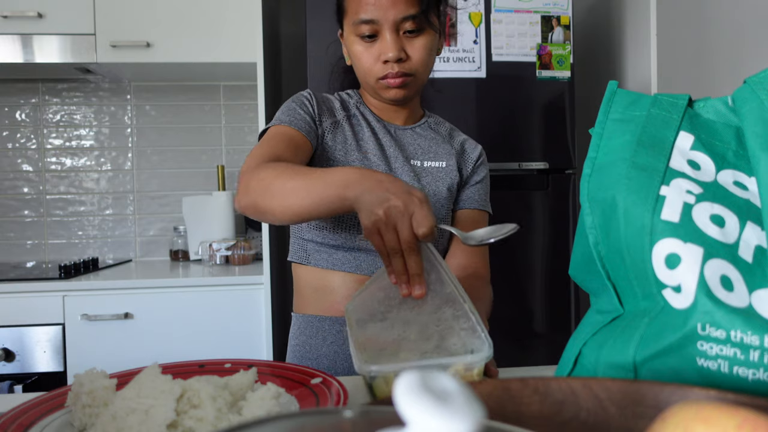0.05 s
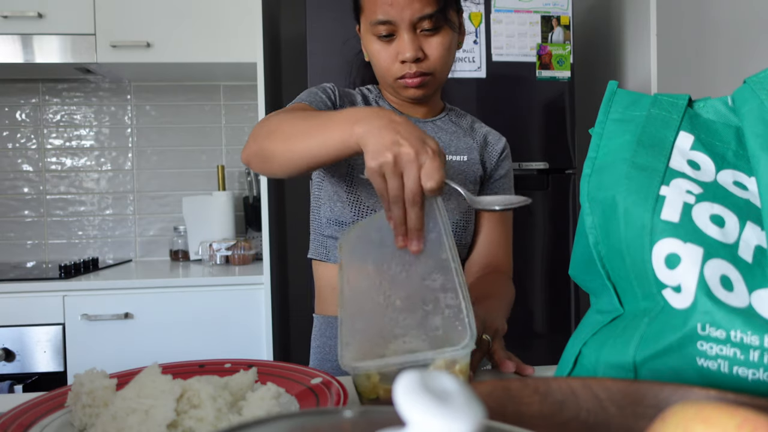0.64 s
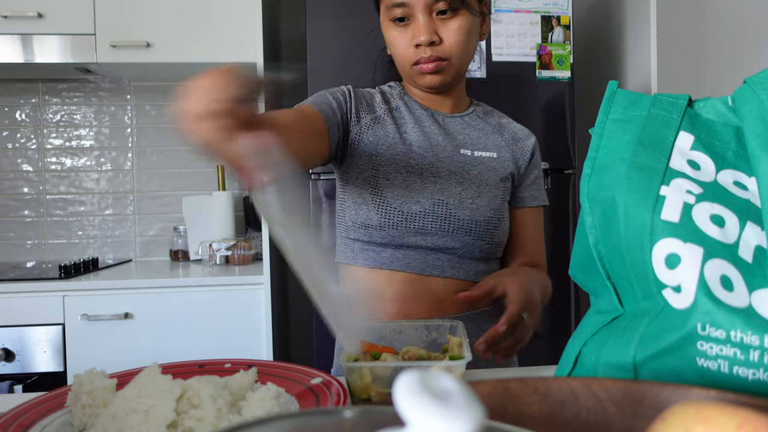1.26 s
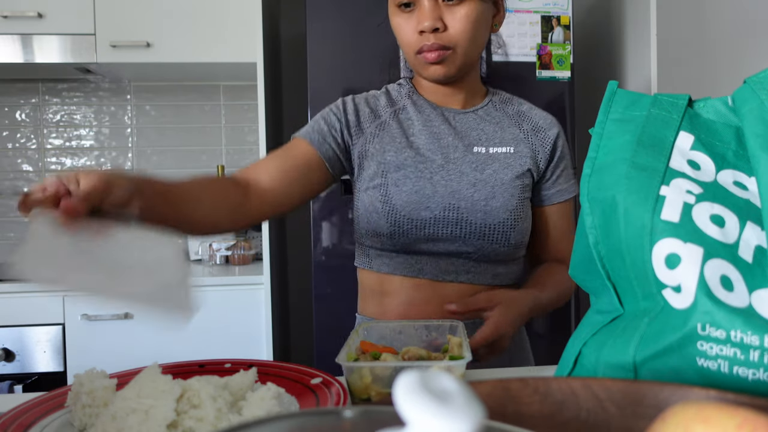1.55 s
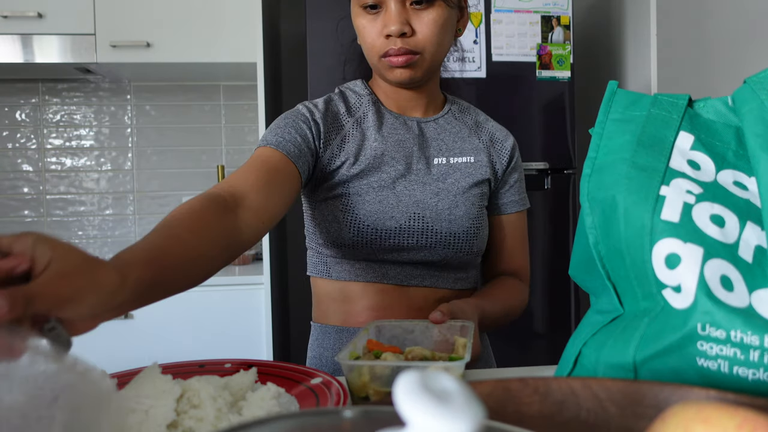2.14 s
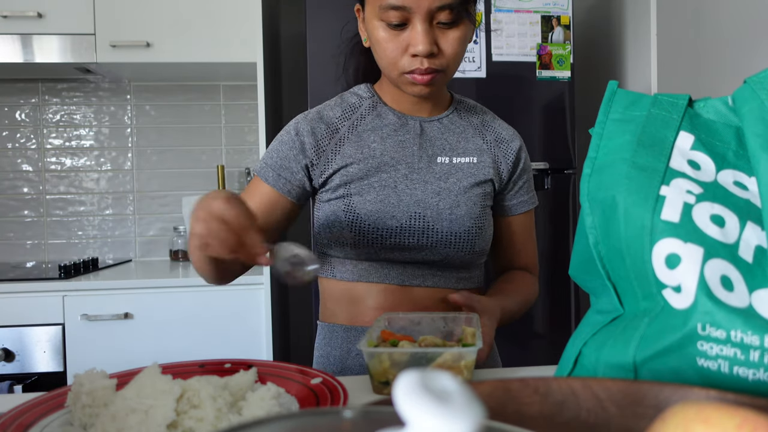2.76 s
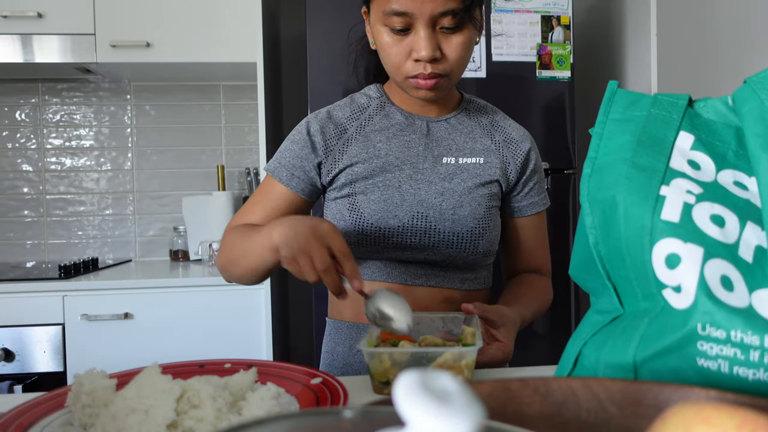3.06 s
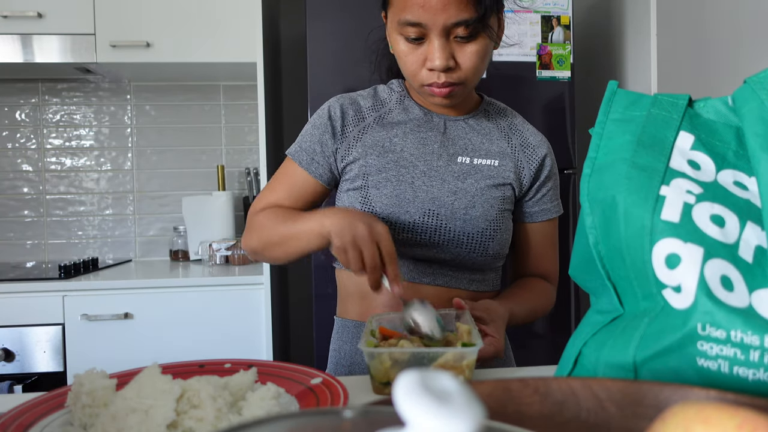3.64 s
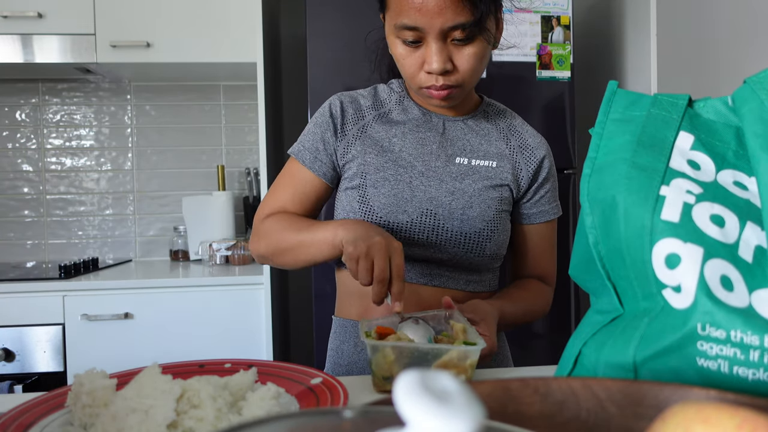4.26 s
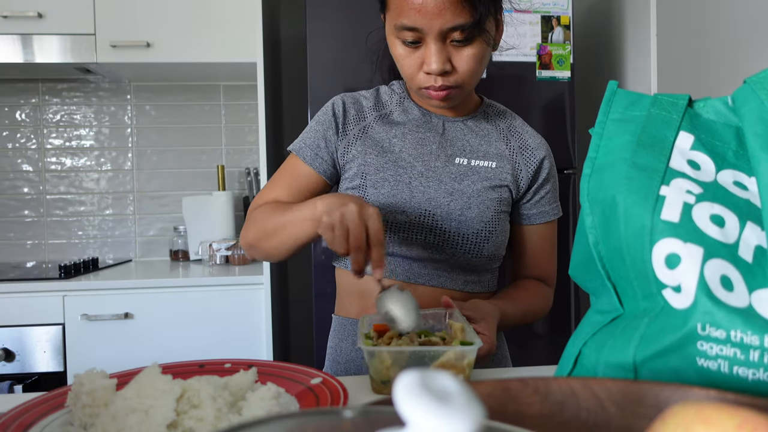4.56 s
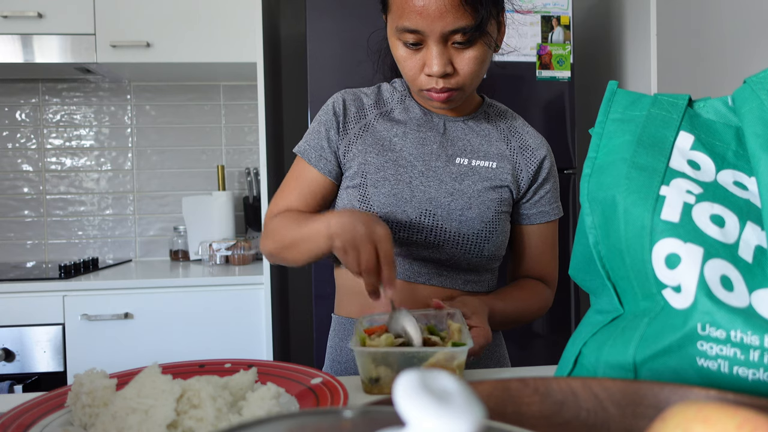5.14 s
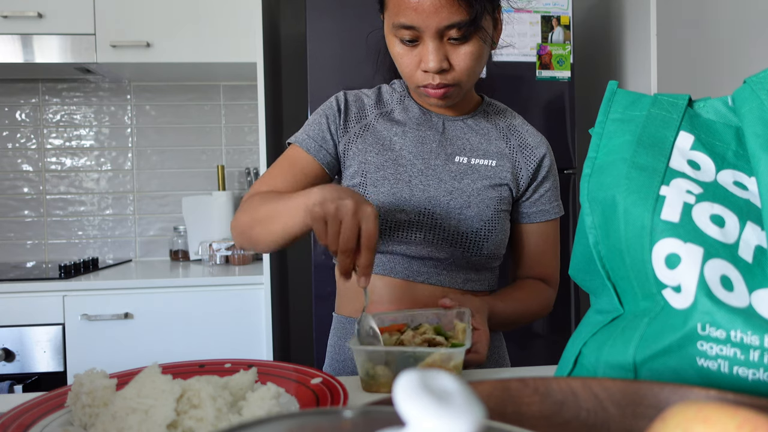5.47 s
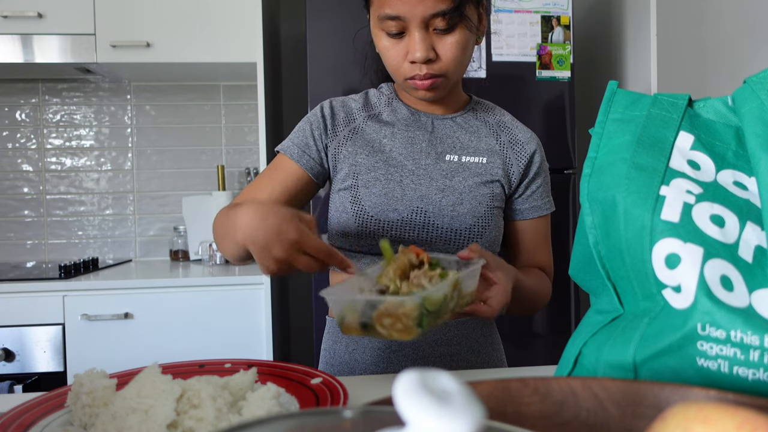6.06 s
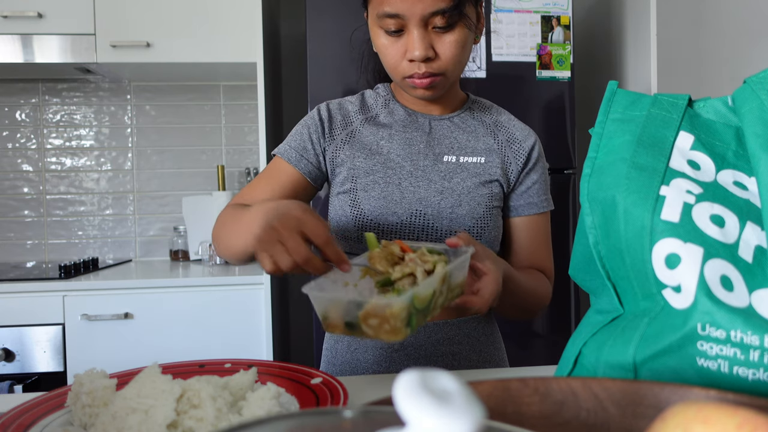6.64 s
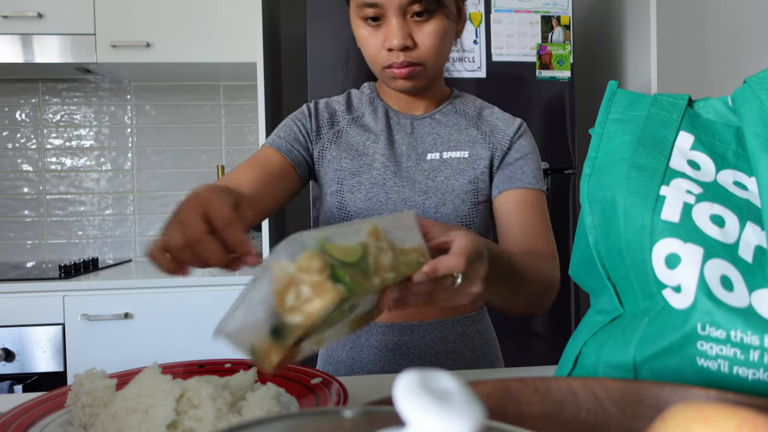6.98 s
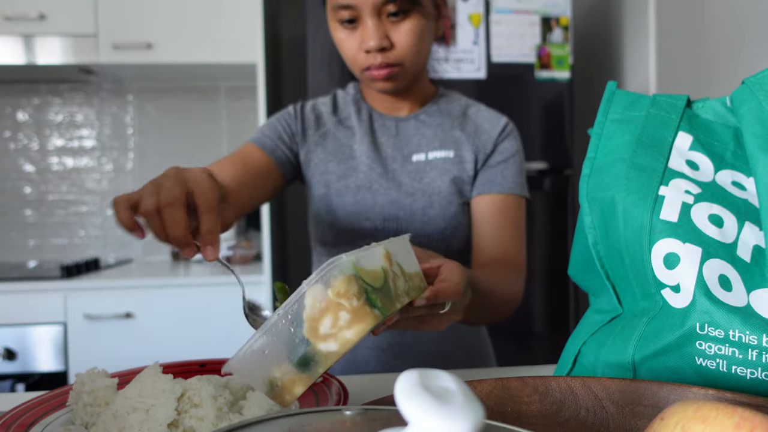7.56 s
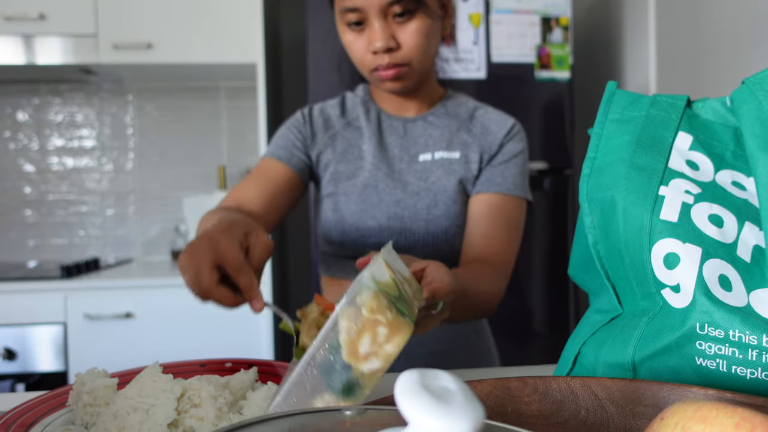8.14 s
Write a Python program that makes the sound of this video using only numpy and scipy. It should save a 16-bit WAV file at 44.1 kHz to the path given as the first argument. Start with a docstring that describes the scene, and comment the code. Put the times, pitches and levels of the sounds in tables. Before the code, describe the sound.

A plastic lid peels off a food tub in a run of sharp snaps. After a knock with a brief ring, the lid is put down with a quick, clinking clatter. A metal spoon then digs through moist food in short, soft strokes with sticky clicks, and taps against the tub several times. The sounds are fairly close, in a hard-walled kitchen with short reverberation and a faint hiss.

```python
"""Opening a plastic food tub

In a tiled kitchen the lid snaps and peels free of the rim and is laid down with a clatter. A metal
spoon digs through moist food in short strokes and taps the tub, which is tipped over a plate.
Each contact is a few milliseconds of chatter that excites the damped resonances of the plastic,
brighter the harder it is; the hard room reverberates after it."""
import sys
import numpy as np
from scipy import signal
from scipy.fft import rfft, irfft
from scipy.io import wavfile

SR = 44100
rng = np.random.default_rng(int(sys.argv[2]) if len(sys.argv) > 2 else 0)


def to_wav(sig):
    """Store sig (one row per channel, or 1-D mono) as 16-bit WAV at the path in sys.argv[1].

    Samples outside -1..1 are clipped; the rate is SR.
    """
    pcm = np.clip(np.atleast_2d(sig), -1, 1) * 32767
    pcm = np.round(pcm).astype(np.int16)
    wavfile.write(sys.argv[1], SR, pcm.T)  # frames by channels


N = 366603
TIME = np.arange(N) / SR
SIZE = 2048  # samples in the impulse response of one contact
FREQ = np.arange(SIZE // 2 + 1) * SR / SIZE + 1

# fingers rubbing the plastic, then the spoon dragging through food: start_s, length_s, level_db
STROKES = [(1.048, 0.18, -57), (1.36, 0.11, -62), (1.798, 0.14, -63), (2.174, 0.18, -56),
           (3.249, 0.053, -68.5), (3.454, 0.15, -59), (3.924, 0.56, -66.5), (4.657, 0.45, -62.5),
           (4.797, 0.1, -59.5), (5.152, 0.29, -67), (5.498, 0.21, -58), (6.735, 0.24, -66.5),
           (7.867, 0.4, -59.5)]
# the treble falls away steeply above 9 kHz, the same for every contact: frequency_hz, gain_db
TREBLE_LOSS = [(9000, -0.5), (11500, -9.5), (15500, -12.5)]


def undb(db):
    """Decibels as an amplitude ratio."""
    return 10 ** (np.asarray(db) / 20)


def add(track, start_s, sound):
    """Superposition: a sound adds to the track from its start time."""
    i = max(0, int(start_s * SR))
    track[i:i + len(sound)] += sound[:max(0, N - i)]


def across(hz, points, column=1):
    """Interpolation of a table along log frequency."""
    points = np.array(points)
    return np.interp(np.log(hz + 1), np.log(points[:, 0]), points[:, column])


def colour(x, spectrum):
    """Spectral shaping, scaled to unit rms."""
    shaped = irfft(rfft(x) * undb(across(np.fft.rfftfreq(N, 1 / SR), spectrum)), N)
    return shaped / shaped.std()


def highpass(x, order, cutoff_hz):
    """Butterworth attenuation below the cutoff."""
    return signal.sosfilt(signal.butter(order, cutoff_hz, "high", fs=SR, output="sos"), x)


def resonance(hz, width_hz):
    """Gain of a damped resonance with steep skirts."""
    return 1 / (1 + ((FREQ / hz - hz / FREQ) * hz / width_hz) ** 2)


def minimum_phase(gain):
    """Minimum phase gives the quickest impulse response that has this gain."""
    cepstrum = irfft(np.log(gain + 1e-6))
    cepstrum[1:SIZE // 2] *= 2
    cepstrum[SIZE // 2 + 1:] = 0
    return irfft(np.exp(rfft(cepstrum)))


def radiate(sound, room_db):
    """Sound takes two paths: direct to the listener, and out into the room."""
    return np.array([sound, sound * undb(room_db)])


def stereo(mid, side, side_db):
    """Sum and difference: the weaker the side signal, the more alike left and right."""
    return mid + undb(side_db) * side * np.array([[1], [-1]])


def air(level_db, side_db, waver_db):
    """Background noise: a faint hiss whose level wavers slowly."""
    spectrum = [(18, -71), (30, -39), (75, -17.5), (252, -7), (486, -5.5), (740, 3.5), (844, -2),
                (1100, 1.5), (1720, -2.5), (2980, -5), (3670, -8), (3980, -6.5), (8980, -17.5),
                (14800, -22.5), (16000, -28.5)]  # room hiss: frequency_hz, density_db
    mid, side = (colour(rng.standard_normal(N), spectrum) for _ in range(2))
    drift = signal.resample(rng.standard_normal(size=40), N)
    return undb(level_db - waver_db * drift) * stereo(mid, side, side_db)


def kitchen(sound, gap_s, build_s, worktop_db, side_db):
    """Reverberation: the worktop reflects first, then tiles and cupboards build a decaying tail."""
    response = [(120, -10, .5), (290, 0, 0.25), (390.7, -4.5, 0.76), (935, -2.5, 0.57), (1390, -3.5, 0.64),
                (4000, 0, 0.56), (9000, -2, 0.54), (14620, 0, .38)]  # reverberant field: frequency_hz, level_db, t60_s
    t = TIME[:SR]
    log_freq = np.log(np.fft.rfftfreq(SR, 1 / SR) + 1)
    onset = np.clip((t - gap_s) / build_s, 0, 1) ** .25
    noise = rfft(rng.standard_normal((2, SR)))
    centres_hz = np.geomspace(60, 18000, 24)
    tail = 0
    for hz, share in zip(centres_hz, np.eye(len(centres_hz))):
        band = np.interp(log_freq, np.log(centres_hz), share)
        t60_s = across(hz, response, column=2)
        part = irfft(noise * band) * onset * undb(-60 * t / t60_s)
        part /= np.linalg.norm(part, axis=1, keepdims=True)
        tail += part * np.sqrt(np.mean(band ** 2)) * undb(across(hz, response))
    tail[0, int(gap_s * SR)] += undb(worktop_db)
    mid, side = signal.fftconvolve(sound[None], tail, axes=1)[:, :N]
    return stereo(mid, side, side_db)


def chatter(contact_s):
    """Broadband excitation: a brief run of micro-slips with unit energy."""
    fade = np.exp(-(TIME[:SIZE] / contact_s) ** 2)
    force = rng.standard_normal(SIZE) * fade
    for _ in range(4):  # flatten the spectrum while keeping the burst short
        force = irfft(np.exp(1j * np.angle(rfft(force)))) * np.sqrt(fade)
    return force / np.linalg.norm(force)


def ring(modes, gain_db):
    """Free vibration: a sum of exponentially decaying modes."""
    t = TIME[:SR // 2]
    hz, db, t60_s = np.transpose(modes)[:, :, None]
    sign = rng.choice([-1, 1], (len(modes), 1))
    waves = sign * undb(db + gain_db - 60 * t / t60_s) * np.sin(2 * np.pi * hz * t)
    return highpass(waves.sum(axis=0), 2, 800)  # a small object radiates no bass


def pops(events, relative_width, contact_s, gain_db, room_db):
    """Impulse excitation: each small contact drives one damped resonance."""
    out = np.zeros(N)
    for start_s, db, hz in events:
        gain = resonance(hz, relative_width * hz) * undb(across(FREQ, TREBLE_LOSS))
        pop = signal.fftconvolve(minimum_phase(gain), chatter(contact_s))
        add(out, start_s, undb(db + gain_db) * pop / np.abs(pop).max())
    return radiate(out, room_db)


def plastic(spectrum, contact_s, ripple_db):
    """Modal coupling: each spot on the thin wall favours its own modes, rippling the spectrum."""
    coupling = signal.resample(rng.standard_normal(size=90), len(FREQ))
    ripple = undb(ripple_db * np.tanh(coupling))
    gain = spectrum * ripple / np.sqrt(np.mean(ripple ** 2))
    return signal.fftconvolve(minimum_phase(gain), chatter(contact_s))


def contacts(blows, thud_db, wall_db, crack_db, contact_s, thud_hz, rim_width, direct_db, lowest_hz):
    """Impact on plastic: the hollow thuds, the wall flexes, the rim rings; hard blows crack more."""
    near, far = np.zeros((2, N))
    for start_s, db, hardness_db, rim_hz, room_db in blows:
        thud = undb(thud_db - .84 * hardness_db) * resonance(thud_hz, thud_hz)
        wall = undb(wall_db - .13 * hardness_db) * resonance(1462, 2000)
        rim = resonance(rim_hz, rim_width * rim_hz)
        crack = undb(crack_db + hardness_db) * resonance(7000, 16000)
        spectrum = np.linalg.norm([thud, wall, rim, crack], axis=0) * undb(db + across(FREQ, TREBLE_LOSS))
        # the wall modes stand out in any one direction and average out in the room
        add(near, start_s, plastic(spectrum, contact_s, ripple_db=4.5) * undb(direct_db))
        add(far, start_s, plastic(spectrum, contact_s, ripple_db=1.8) * undb(room_db))
    return highpass([near, far], 3, lowest_hz)


def effort(attack_s=.014, release_s=.035):
    """Amplitude envelope of the friction: each stroke swells, holds and dies away."""
    push = np.zeros(N)
    for start_s, length_s, db in STROKES:
        swell = np.clip((TIME - start_s) / attack_s, 0, 1)
        release = np.exp(-np.maximum(TIME - start_s - length_s, 0) / release_s)
        push += undb(db) * swell * release
    return push


def scraping(gain_db, room_db, grains_per_s=1100, spread_db=3):
    """Shot noise: fingers rub and moist food parts in a dense crackle of tiny impulses."""
    spectrum = [(800, -19.5), (2400, 0), (3000, 2.5), (3500, -1), (4100, 3), (4700, -0.5), (8000, -4),
                (10500, -10.5), (15000, -19.5)]  # scraping, with two resonances of the filled tub: frequency_hz, level_db
    grains = (rng.random(N) < grains_per_s / SR) * rng.choice([-1, 1], N)
    sizes = undb(spread_db * np.minimum(rng.exponential(size=N), 3))
    crackle = colour(grains * sizes, spectrum) * effort() * undb(gain_db)
    return radiate(crackle, room_db)


def tub_bumps():
    """Soft, long contacts excite low resonances as the tub is moved and tipped."""
    bumps = [(.56, -34, 305), (.958, -52, 168), (7.263, -51.5, 624), (7.279, -56.5, 728), (7.312, -47, 568)]  # bumps of the tub: start_s, level_db, pitch_hz
    return pops(bumps, relative_width=.3, contact_s=.014, gain_db=-1, room_db=-2.5)


def sticky_clicks(per_s=14, boost_db=9, scatter_db=7, pitch_hz=5950, spread_octaves=.52):
    """Adhesion: spoon, food and fingers click at set moments and at random within each stroke."""
    clearest = [(1.586, -33.5, 8700), (1.602, -32, 5230), (1.7636, -35.5, 6800), (1.944, -47, 8700),
                (3.231, -46, 9200), (3.307, -41.5, 7530), (3.4878, -45, 5360), (4.109, -38.5, 4500),
                (4.2505, -41.5, 5350), (4.291, -38.5, 5300), (4.4074, -42.5, 4500), (4.784, -34.5, 7700),
                (4.842, -32.5, 7660), (5.005, -38, 5430), (5.492, -38, 5260), (5.721, -38, 7200),
                (6.4635, -41, 2920), (6.5527, -46.5, 6100), (7.714, -41.5, 5170), (7.740, -38.5, 5100)]  # the clearest clicks: start_s, level_db, pitch_hz
    clicks = list(clearest)
    for start_s, length_s, db in STROKES:
        waits_s = np.cumsum(rng.exponential(size=16)) / per_s
        for wait_s, (strong, high) in zip(waits_s, rng.standard_normal((16, 2)).clip(-2, 2)):
            if wait_s < length_s:
                hz = pitch_hz * 2 ** (spread_octaves * high)
                clicks.append((start_s + wait_s, db + boost_db + scatter_db * strong, hz))
    return pops(clicks, relative_width=.5, contact_s=.0052, gain_db=-2, room_db=-2.5)


def taps(rebound_s=.0065, loss_db=11.5, rebound_hz=1580, rebound_room_db=6.5):
    """Elastic rebound: each knock lands again, softly, on the broad wall that radiates into the room."""
    # spoon and lid knocking on plastic: start_s, strength_db, hardness_db, rim_hz, room_db
    knocks = [(1.4942, 9, -11, 1780, -1.5), (1.69, -11, -23.5, 1700, 12), (2.0748, 6, 0, 1197, -2),
              (5.426, -3, 5, 4480, 1.5), (5.764, 1.5, -5.5, 2310, 5), (6.023, -3.5, -1, 1500, 5.5),
              (6.079, -11, -7, 1220, 10.5), (6.0946, -7, -1.5, 3400, 0), (6.170, 6, -4.5, 3650, -7.5),
              (6.1766, 1, -3, 1340, 6.5), (6.2507, -11.5, 2, 3440, 4.5), (7.5178, -2.5, 2.5, 3130, 4.5),
              (7.728, -16.5, 2, 3500, 6.5), (7.794, -3.5, 1.5, 3800, -2.5), (7.826, -20, -8, 3580, -8),
              (8.224, -7, -6, 940, 4.5), (8.3085, 4, -1.5, 2170, 0)]
    rebounds = [(start_s + rebound_s, db - loss_db, hardness_db, rebound_hz, rebound_room_db)
                for start_s, db, hardness_db, *_ in knocks]
    return contacts(knocks + rebounds, thud_db=-28.5, wall_db=-5, crack_db=-18.5, contact_s=.0032,
                    thud_hz=300, rim_width=.44, direct_db=1.5, lowest_hz=150)


def lid_ring(start_s, gain_db, room_db):
    """Natural modes: the free lid and the spoon knock together and sound one short note."""
    modes = [(1292, -13, .25), (1712, 0, .3), (1745, -6, .25), (1725, -22, 1.3), (1997, -2, .04),
             (5170, -20, .12), (11240, -32, .25)]  # modes of lid and spoon: pitch_hz, level_db, t60_s
    out = np.zeros(N)
    add(out, start_s, ring(modes, gain_db))
    return radiate(out, room_db)


def bounces(first_gap_s=.019, restitution=.9, loss_db=2.5, clink_loss_db=3.5, settle_hz=2723):
    """Inelastic collisions: after their last blow, lid and spoon bounce ever quicker and weaker."""
    # lid and spoon put down: start_s, strength_db, hardness_db, rim_hz, clink_db
    blows = [(2.263, 3.5, -1, 2820, 6.5), (2.2768, -3.5, -5, 5360, -5), (2.3554, 11.5, 6, 3750, 8),
             (2.385, 7, -0.5, 3200, 11), (2.406, 10.5, 13, 4050, 0.5), (2.4126, 14.5, 4, 2140, 12),
             (2.418, 16, 7, 3870, 7.5), (2.4544, 9, -3, 3850, 16.5), (2.474, 5.5, 7, 3800, 1.5),
             (2.514, 17, 6.5, 3500, 14), (2.562, 12, 8, 2300, 11), (2.5715, 10.5, -10, 5360, 5),
             (2.588, 5.5, 1, 3700, 11)]
    last_s, db, hardness_db, _, clink_db = blows[-1]
    times_s = last_s + np.cumsum(first_gap_s * restitution ** np.arange(6))
    settling = [(start_s, db - k * loss_db, hardness_db, settle_hz, clink_db - k * clink_loss_db)
                for k, start_s in enumerate(times_s, 1)]
    return blows + settling


def clinks(gain_db, room_db, focus_db_per_octave):
    """Selective excitation: each bounce drives most the ringing modes nearest its own pitch."""
    modes = [(1209, -15, .15), (1770, -12, .12), (2085, -8, .2), (2898, -6, .19), (2940, -8, .12),
             (3475, -9, .08), (3797, -2, .08), (3850, -8, .06), (4035, -8, .08), (4770, -10.5, .33),
             (5780, -15, .25), (9515, -6, .08)]  # hard modes of the clatter: pitch_hz, level_db, t60_s
    mode_hz = np.array(modes)[:, :1]
    out = np.zeros(N)
    for start_s, _, _, rim_hz, clink_db in bounces():
        detuning_db = focus_db_per_octave * np.abs(np.log2(mode_hz / rim_hz))
        drive_db = clink_db + gain_db - detuning_db + rng.standard_normal(mode_hz.shape)
        add(out, start_s, ring(modes, drive_db))
    return radiate(out, room_db)


def clatter(room_db):
    """Repeated impact: the plastic sounds briefly at each bounce of lid and spoon."""
    blows = [(start_s, db, hardness_db, hz, room_db) for start_s, db, hardness_db, hz, _ in bounces()]
    return contacts(blows, thud_db=-39.5, wall_db=-4, crack_db=-20.5, contact_s=.0034,
                    thud_hz=507, rim_width=.61, direct_db=.5, lowest_hz=370)


def squeak(start_s, slips_per_s, gain_db, decay_s, room_db):
    """Periodic stick-slip: even spacing gives a pitch to the last corner of the lid coming free."""
    out = np.zeros(N)
    slip = minimum_phase(resonance(6900, 9500))
    for t in np.arange(12) / slips_per_s:
        add(out, start_s + t, undb(gain_db) * np.exp(-t / decay_s) * slip)
    return radiate(out, room_db)


def peeling(gap_s=.0125, jitter_s=.002, scatter_db=2.5, hardness_db=0, room_db=4.5):
    """Stick-slip: between the big snaps the rim lets go in small, nearly even steps."""
    runs = [(0.031, .095, 12.5, 5270), (0.402, .03, 16.5, 1204)]  # runs of slips along the rim: start_s, length_s, strength_db, rim_hz
    slips = []
    for start_s, length_s, db, rim_hz in runs:
        for k, (late, strong) in enumerate(rng.standard_normal((16, 2))):
            if k * gap_s < length_s:
                slip_s = start_s + k * gap_s + jitter_s * late
                slips.append((slip_s, db + scatter_db * strong, hardness_db, rim_hz, room_db))
    return contacts(slips, thud_db=-28.5, wall_db=-5.5, crack_db=-15.5, contact_s=.004,
                    thud_hz=400, rim_width=.3, direct_db=2, lowest_hz=200)


def lid_snaps():
    """Sudden release of strain: the lid snaps off the rim and excites the whole tub."""
    snaps = [(.0075, 9, -1, 3950, 1), (.0192, 15.5, -3, 5100, 5), (.0492, 13, 3, 3370, 3),
             (.0712, 16.5, 1.5, 2220, 7.5), (.3938, 17, -8.5, 5200, 3), (.4358, 11.5, 0, 2530, 11.5),
             (.558, 15.5, 4.5, 6100, 2), (.7275, 7, 3.5, 6100, -3), (.78, 10.5, 6.5, 5740, -0.5),
             (.797, 6.5, 9, 7200, -11), (.91, -5, -22, 4670, 2.5), (.958, 10, -7, 1400, -4)]  # snaps of the lid: start_s, strength_db, hardness_db, rim_hz, room_db
    return contacts(snaps, thud_db=-25.5, wall_db=.9, crack_db=-9, contact_s=.0038,
                    thud_hz=332, rim_width=.56, direct_db=-.5, lowest_hz=130)


def scene():
    """Direct and reverberant sound of lid, tub and spoon add over the faint hiss of the kitchen."""
    balance = [(.85, -0.14), (1.2, 1.5), (2.6, 1.4), (3.0, -0.8), (7.5, -.3), (8.2, 1.4)]  # where the hands work: time_s, left_minus_right_db
    hiss = air(level_db=-63, side_db=-7.5, waver_db=.7)
    near, far = (scraping(gain_db=-3.5, room_db=-2)
                 + clatter(room_db=-3)
                 + taps()
                 + clinks(gain_db=-32.5, room_db=-33, focus_db_per_octave=9.5)
                 + lid_ring(start_s=1.494, gain_db=-28, room_db=-2.5)
                 + squeak(start_s=.78, slips_per_s=1440, gain_db=7.5, decay_s=.0035, room_db=-2)
                 + tub_bumps()
                 + peeling()
                 + lid_snaps()
                 + sticky_clicks())
    handling = near + kitchen(far, gap_s=.0063, build_s=.01, worktop_db=-14, side_db=-14)
    pan_db = np.interp(TIME, *np.transpose(balance)) * np.array([[.5], [-.5]])
    return handling * undb(pan_db) + hiss


def record(dry):
    """Band limiting: the microphone sheds the deep bass and cuts the top."""
    top_cut = signal.ellip(8, .2, 70, 16300, fs=SR, output="sos")
    return signal.sosfilt(top_cut, highpass(dry, 1, 50))


dry = scene()
out = record(dry)
to_wav(out)
```